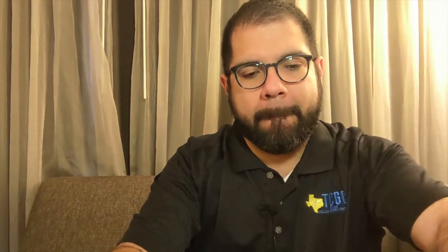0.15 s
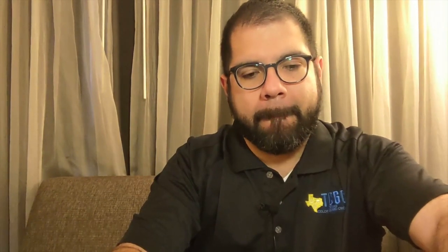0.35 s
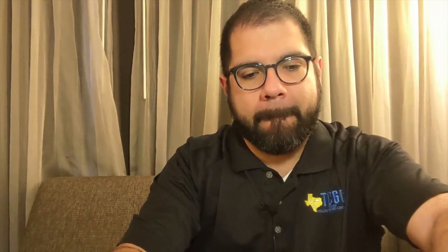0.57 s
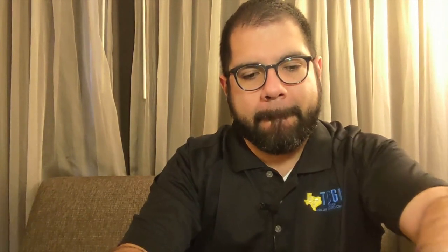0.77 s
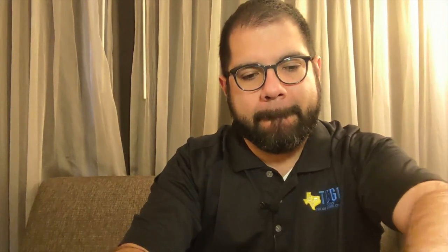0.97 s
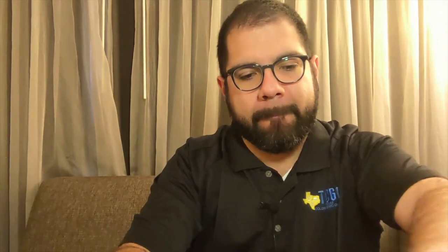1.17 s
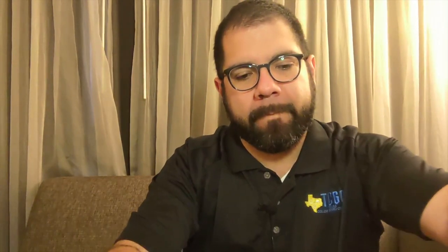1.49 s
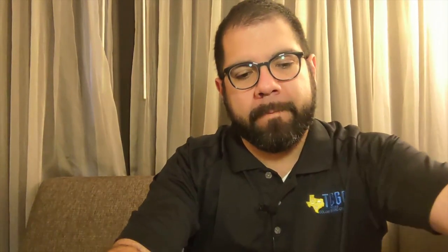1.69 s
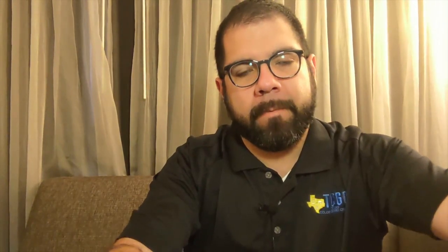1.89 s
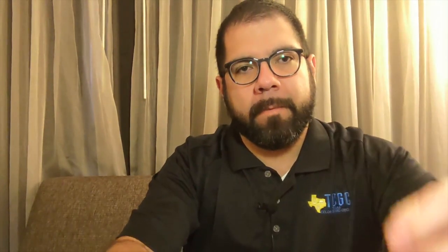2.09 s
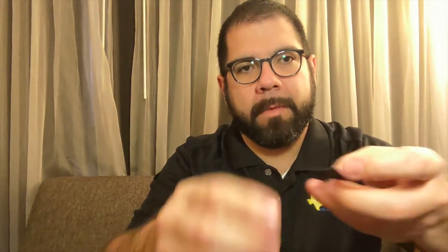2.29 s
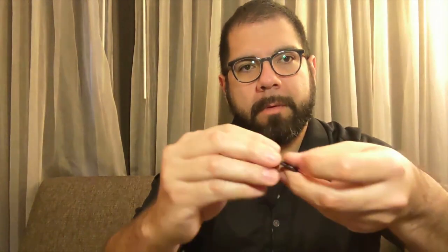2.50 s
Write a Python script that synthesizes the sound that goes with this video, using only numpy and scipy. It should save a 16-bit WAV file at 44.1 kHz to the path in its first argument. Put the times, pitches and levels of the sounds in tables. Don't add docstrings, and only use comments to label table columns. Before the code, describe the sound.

Small plastic cards and their case are handled close to the microphone: nearly silent at first, a few light ticks, then a sharp hard knock, a second clattering knock, and steady light rattling over low ventilation rumble.

```python
import sys
import numpy as np
from scipy import signal
from scipy.fft import rfft, irfft
from scipy.io import wavfile

SR = 44100
rng = np.random.default_rng(int(sys.argv[2]) if len(sys.argv) > 2 else 0)


def transcribe(signal):
    frames = np.atleast_2d(signal).T
    limited = np.clip(frames, -1, 1)
    pcm = np.round(limited * 32767).astype(np.int16)
    wavfile.write(sys.argv[1], SR, pcm)


def level_to_linear(level):
    exponent = np.asarray(level, float) / 20
    return 10 ** exponent


N = 116865


def at_hz(points, hz):
    p = np.array(points, float)
    return np.interp(np.log(np.maximum(hz, 1)), np.log(p[:, 0]), p[:, 1])


def rms_one(x):
    return x / np.sqrt(np.mean(x ** 2) + 1e-20)


def colour(x, table):
    n = x.shape[-1]
    gain = level_to_linear(at_hz(table, np.fft.rfftfreq(n, 1 / SR)))
    return irfft(rfft(x) * gain, n)


def peak(x, hz, width_hz):
    r = np.exp(-np.pi * width_hz / SR)
    poles = [1, -2 * r * np.cos(2 * np.pi * hz / SR), r * r]
    return signal.lfilter([(1 - r * r) / 2, 0, (r * r - 1) / 2], poles, x + 1e-18)


def peak_twice(x, hz, width_hz):
    return peak(peak(x, hz, width_hz), hz, width_hz)


def highpass(x, order, hz):
    return signal.sosfilt(signal.butter(order, hz, "high", fs=SR, output="sos"), x)


# (f/Hz, level/dB per Hz)
AIR_SPECTRUM = [(25, -16.5), (64, -6.5), (141, -13), (394, -18), (850, -27.5), (1500, -37), (4000, -46),
                (16000, -58.5)]
# (f/Hz, bandwidth/Hz, level/dB)
DUCT_MODES = [(61.56, 4.5, -56), (118.4, 23, -63.5), (167.1, 7.5, -61), (204.4, 22, -61.5),
              (397.4, 9.8, -62), (14282, 15, -110)]
# (f/Hz, coherence/0-1)
COHERENCE = [(60, 0.93), (250, 0.88), (600, 0.7), (1200, 0), (2500, 0.05), (12000, 0)]
AIR_DB = -49


def air():
    hz = np.fft.rfftfreq(N, 1 / SR)
    alike = np.clip(at_hz(COHERENCE, hz), 0, 1)
    mid, side = rfft(colour(rng.standard_normal((2, N)), AIR_SPECTRUM))
    bed = irfft(np.sqrt(1 + alike) * mid + np.sqrt(1 - alike) * side * [[1], [-1]], N)
    duct = 0
    for f, width, db in DUCT_MODES:
        duct = duct + level_to_linear(db) * rms_one(peak_twice(rng.standard_normal(N), f, width))
    return level_to_linear(AIR_DB) * rms_one(bed) + duct


# (f/Hz, T60/s)
ROOM_T60 = [(200, 1), (600, 0.31), (1500, 0.29), (4000, 0.35), (10000, 0.26), (16000, 0.22)]
ROOM_DB, ROOM_GAP_S, WIDE_FROM_HZ = -1, 0.0018, 700
EARLY_DB, EARLY_S = -4, 0.0067


def room(x):
    n = SR // 2
    t = np.arange(n) / SR
    white = rfft(rng.standard_normal((2, n)))
    octave = np.log2(np.fft.rfftfreq(n, 1 / SR) + 1)
    tail = 0
    for hz in 125 * 2. ** np.arange(8):
        band = np.clip(1 - np.abs(octave - np.log2(hz)), 0, 1)
        mid, side = irfft(white * band, n)
        wide = 1 / np.sqrt(1 + (WIDE_FROM_HZ / hz) ** 2)
        tail = tail + (mid + wide * side * [[1], [-1]]) * 1000. ** (-t / at_hz(ROOM_T60, hz))
    early = 1 + level_to_linear(EARLY_DB) * 4 * np.exp(-t / EARLY_S)
    tail = tail * (t > ROOM_GAP_S) * early
    tail = tail / np.sqrt(np.sum(tail ** 2) / 2)
    return level_to_linear(ROOM_DB) * signal.fftconvolve(x[None], tail, axes=1)[:, :N]


SWAY_HZ, SWAY_DB, SWAY_FROM_S, SWAY_WIDTH_HZ = 220, -43, 2.29, 39


def sway():
    t = np.arange(N) / SR
    wobble = rms_one(peak_twice(rng.standard_normal(N), SWAY_HZ, SWAY_WIDTH_HZ))
    tone = np.sin(2 * np.pi * SWAY_HZ * t) + .45 * wobble
    onset = np.clip((t - SWAY_FROM_S) / 0.015, 0, 1)
    return level_to_linear(SWAY_DB) * onset * tone


# (f/Hz, level/dB, T60/s)
DESK_MODES = [(149, -24, 0.18), (235.5, -25, 0.52), (309.2, -2.5, 0.23), (350.2, -1, 0.094),
              (444, -15.5, 0.25), (543.4, -19, 0.2), (739, -9.5, 0.086), (1067, -13.5, 0.078)]
# (t/s, level/dB)
DESK_THUMPS = [(0.358, -45.5), (1.291, -46), (1.49, -43.5), (1.686, -43.5), (1.791, -40.5), (1.884, -19),
               (1.898, -36.5), (1.985, -30.5), (2.087, -34.5), (2.172, -23.5), (2.2, -30), (2.29, -45.5),
               (2.333, -37), (2.41, -36), (2.453, -37), (2.53, -39), (2.572, -42)]
THUMP_LAG_S, DESK_CUT_HZ, MODE_LUCK_DB = .0012, 190, 1.5


def desk():
    s, db = np.transpose(DESK_THUMPS)
    luck = rng.standard_normal((len(s), len(DESK_MODES)))
    out = 0
    for (hz, mode_db, t60), z in zip(DESK_MODES, luck.T):
        push = np.zeros(N)
        push[((s + THUMP_LAG_S) * SR).astype(int)] = level_to_linear(db + mode_db + MODE_LUCK_DB * z)
        r = level_to_linear(-60 / (t60 * SR))
        w = 2 * np.pi * hz / SR
        out = out + signal.lfilter([0, np.sin(w)], [1, -2 * r * np.cos(w), r * r], push + 1e-18)
    return highpass(out, 2, DESK_CUT_HZ)


GRAINS_PER_S, GRAIN_SPREAD_DB = 3000, 1.5


def grains(n):
    noise, chance, size = rng.random((3, n))
    noise = noise - .5
    strength = level_to_linear(-GRAIN_SPREAD_DB * np.log(size + 0.015))
    return noise + (chance < GRAINS_PER_S / SR) * np.sign(noise) * strength


# (t/s, duration/s, level/dB, ring f/Hz, ring
# level/dB)
SLIDE_EVENTS = [(0.157, 0.032, -60, 1170, -4), (.355, 0.037, -54, 1210, 3.5),
                (.356, 0.0076, -63, 2000, -12), (0.45, 0.031, -58, 1260, 1), (1.262, 0.064, -56, 1870, -10),
                (1.463, 0.035, -52.5, 4300, -13), (1.364, 0.31, -58.5, 4330, -21),
                (1.522, 0.29, -62, 2510, -14), (1.691, 0.079, -45, 1490, -10), (1.756, 0.1, -42, 1500, -12),
                (1.93, 0.12, -45.5, 2000, -7), (2.089, 0.049, -32, 2260, 0.5),
                (2.137, 0.071, -35.5, 2580, -2.5), (2.099, 0.072, -41, 8000, -1),
                (2.12, 0.037, -38, 2740, 0), (2.198, 0.052, -41, 2400, -8), (2.25, 0.76, -57.5, 2000, -3.5)]
# (f/Hz, level/dB)
RASP_SPECTRUM = [(300, 0), (800, 3), (1500, 1.5), (3000, -9), (6000, -13.5), (10000, -21), (16000, -27)]
SLIDE_Q = 1.26


def slides():
    out, t = np.zeros(N), np.arange(N) / SR
    grit = grains(N)
    rasp = rms_one(colour(grit, RASP_SPECTRUM))
    for s, length, db, hz, ring_db in SLIDE_EVENTS:
        x = np.clip((t - s) / length, 0, 1)
        ring = rms_one(peak_twice(grit, hz, hz / SLIDE_Q))
        out += level_to_linear(db) * np.sin(np.pi * x ** 0.5) * (rasp + level_to_linear(ring_db) * ring)
    return out


# (t/s,
# peak level/dB, f/Hz, T60/s)
MODE_PINGS = [(1.2887, -25, 1160, 0.0063), (1.2883, -23, 2260, .004), (1.2883, -12.5, 3470, 0.0027),
              (1.2883, -20, 4640, 0.0036), (1.2883, -10.5, 7940, 0.0024), (1.2883, -18.5, 10300, 0.0029),
              (1.591, -31.5, 2780, 0.015), (1.591, -39, 5730, .02), (1.591, -35, 9600, .008),
              (1.686, -23.5, 1340, 0.02), (1.7005, -39, 1260, 0.0095), (1.7105, -30, 1800, .01),
              (1.711, -35, 4280, 0.015), (1.798, -27, 1600, .02), (1.882, -12, 1944, 0.026),
              (1.883, -24, 1090, 0.019), (1.882, -15, 1394, 0.048), (1.883, -28, 714, 0.081),
              (1.97, -35, 3890, 0.009), (2.0865, -16.5, 308, 0.37), (2.087, -19, 357.4, 0.39),
              (2.092, -31.5, 151.4, 0.25), (2.0862, -14.5, 738, 0.039), (2.085, -23, 1083, 0.034),
              (2.091, -25.5, 1342, .08), (2.085, -17, 1690, .015), (2.125, -25, 2520, .015),
              (2.1435, -19, 2550, .01), (2.16, -19, 3850, .012), (2.21, -26, 1800, .018),
              (2.271, -35, 4740, .008), (2.271, -28, 7860, .006), (2.286, -28.5, 2980, 0.016),
              (2.286, -26, 1510, .012), (2.3321, -40, 2560, 0.014), (2.409, -28, 4700, .01),
              (2.409, -28, 1890, .01), (2.409, -30, 8000, 0.01), (2.509, -39, 9540, .01),
              (2.509, -35, 2440, .01), (2.5285, -33, 1770, 0.011), (2.529, -28, 5200, .01),
              (2.571, -33, 2650, .014), (2.572, -32.5, 6150, 0.014), (2.627, -41, 4750, .008)]
PING_RISE_S = 0.00024


def pings():
    out, t = np.zeros(N + SR), np.arange(SR // 2) / SR
    rise = 1 - np.exp(-t / PING_RISE_S)
    for s, db, hz, t60 in MODE_PINGS:
        i = int(s * SR)
        out[i:i + len(t)] += level_to_linear(db - 60 * t / t60) * np.sin(2 * np.pi * hz * t) * rise
    return out[:N]


# (f/Hz, level/dB)
CRACK_SPECTRUM = [(150, -43), (400, -9.5), (1000, -3.5), (2000, -3), (4000, 0.5), (7000, 2), (11000, -2.5),
                  (16500, -4)]
# (f/Hz, bandwidth/Hz, level/dB)
SHELL_MODES = [(1110, 67, -19), (2000, 220, 0), (2820, 330, -10), (4530, 200, -0.5), (8000, 610, -7),
               (10000, 1000, -8.5)]
EDGE_TOUCHES = [
    (0.1254, -50.5, 1110, 2.5, -8),
    (1.5875, -29.5, 2700, 9.7, -4),
    (1.7098, -26, 1800, 2.6, -2.5),
    (1.7993, -21.5, 1580, 6.2, -3.5),
    (1.9683, -21.5, 3920, 7.2, -1.5),
    (1.9894, -30, 2080, 3.4, -7),
    (2.0463, -32.5, 2290, 7, -7),
                (.007, -39.5, 4130, 2.7, -9.5),
    (1.288, -19.5, 14100, 1.3, -2),
    (1.6833, -31, 1370, 4.4, -5.5),
    (1.209, -61, 1530, 3, -3.5),
    (1.699, -39, 1440, 3.5, -4),
    (1.787, -27, 1600, 6.4, 2),
    (1.868, -28.5, 1870, 7.9, -5),
]
CASE_KNOCKS = [(1.8807, 0.5, 11400, 2.47, 5.5), (1.881, -4, 6720, 3.8, -2), (1.8832, -12, 3180, 7, -4),
               (1.896, -3, 12600, 2.64, -3.5), (1.9194, -30, 8400, 2.8, -5), (2.081, -24, 3000, 7.3, -2),
               (2.0841, -9, 2400, 2.6, -4), (2.098, -11.5, 3020, 4, -4), (2.102, -15.5, 6400, 4.2, 0.5),
               (2.111, -26, 9050, 5.5, 5), (2.127, -22.5, 5500, 7, -2), (2.1538, -13, 2600, 4, -1),
               (2.1613, -19, 8000, 3.5, 0), (2.1692, -14.5, 1870, 1.25, -8.5),
               (2.1719, -18.5, 3970, 4, -3.5), (2.186, -21, 9600, 2.8, -4), (2.208, -22, 4800, 3.2, -2),
               (2.2106, -20.5, 6460, 5.4, -2.5), (2.2247, -21.5, 3030, 4.6, -2)]
CASE_ROCKING = [(2.2698, -20, 4820, 5.6, -1.5), (2.2844, -18.5, 2080, 6.6, -3),
                (2.332, -21, 2680, 5.3, -2.5), (2.3473, -31, 3000, 8.6, -3.5), (2.39, -24.5, 4500, 4.5, -1),
                (2.4073, -18.5, 2050, 5.6, -3.5), (2.4504, -23.5, 1810, 4.5, -3),
                (2.4668, -31.5, 3240, 9.3, -4), (2.5082, -27.5, 2520, 3.3, -3),
                (2.516, -34.5, 2830, 5.1, -5.5), (2.5266, -22.5, 1830, 7.2, -4),
                (2.5694, -25, 2820, 5, -2.5), (2.588, -31.5, 3160, 5.1, -8.5),
                (2.6246, -26.5, 4560, 5.9, -4.5), (2.6454, -25, 2620, 7.1, -4.5)]
RING_DB, RING_Q, DULL_RING = -3.0, 6.0, 1.0
SHELL_LUCK_DB = 3.5


def contacts(rows):
    out = np.zeros((3, N + SR))
    t, f = np.arange(-128, 896) / SR, np.fft.rfftfreq(1024, 1 / SR)
    for s, db, hz, ms, tilt_db in rows:
        x = np.maximum(t, 0) / (np.clip(ms, .3, 12) * 0.00016)
        shape = x ** 2 * np.exp(-x)
        burst = rfft(rng.standard_normal((2, 1024)) * shape)
        burst = irfft(burst / np.sqrt(np.abs(burst)), 1024) * np.sqrt(shape)
        click = np.arange(1024) == 170
        parts = colour(np.vstack([burst, click]), CRACK_SPECTRUM)
        tilt = level_to_linear(tilt_db * np.log2(np.maximum(f, 900) / 2000))
        parts = irfft(rfft(parts) * tilt, 1024)
        shell = 0
        for mode_hz, width, mode_db in SHELL_MODES:
            gain = level_to_linear(mode_db + SHELL_LUCK_DB * rng.standard_normal())
            shell = shell + gain * peak(parts, mode_hz, width)
        ring = level_to_linear(RING_DB - DULL_RING * tilt_db) * np.sqrt(RING_Q) * peak(parts, hz, hz / RING_Q)
        parts = parts + shell + ring
        parts[2] *= np.sqrt(np.sum(parts[0] ** 2) / np.sum(parts[2] ** 2))
        i = int(s * SR)
        out[:, i:i + 1024] += level_to_linear(db) * parts / np.abs(parts[0]).max()
    return out[:, 128:N + 128]


LEFT_LAG_S, LEFT_DB = -0.000011, -.75
EDGE_SIDE_DB, PING_ROOM_DB = -3, -6.5


def scene():
    near, apart, far = contacts(EDGE_TOUCHES + CASE_KNOCKS + CASE_ROCKING)
    rub, clear = slides(), pings()
    near = near + desk() + rub + sway() + clear
    apart = level_to_linear(EDGE_SIDE_DB) * highpass(apart, 1, 1200)
    lag = np.exp(-2j * np.pi * np.fft.rfftfreq(N, 1 / SR) * LEFT_LAG_S)
    direct = np.array([irfft(rfft(near) * lag, N) + apart, near - apart])
    to_room = far + rub + level_to_linear(PING_ROOM_DB) * highpass(clear, 2, 600)
    balance = level_to_linear(LEFT_DB * np.array([[1], [-1]]))
    return (direct + room(to_room) + air()) * balance


def low_pass(x):
    return signal.sosfilt(signal.butter(12, 17160, fs=SR, output="sos"), x)


TOP, CUTOFF_HZ = .9, 16500


def record(dry):
    x = highpass(TOP * np.tanh(dry / TOP), 4, 40)
    x = signal.sosfilt(signal.cheby2(10, 60, CUTOFF_HZ + 700, fs=SR, output="sos"), x)
    return low_pass(x)


dry = scene()
out = record(dry)
transcribe(out)
```